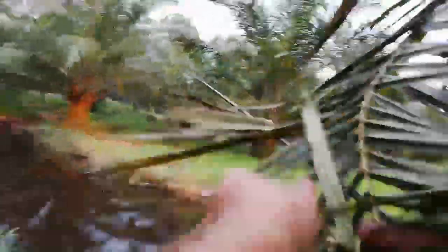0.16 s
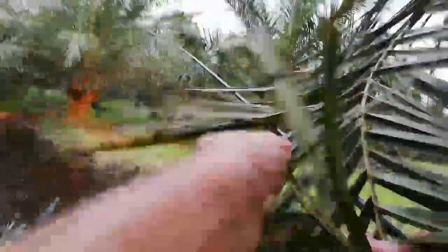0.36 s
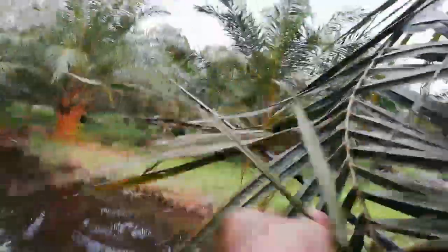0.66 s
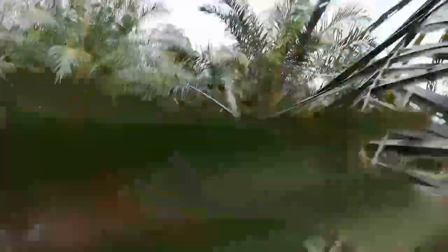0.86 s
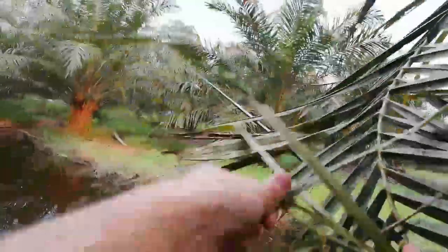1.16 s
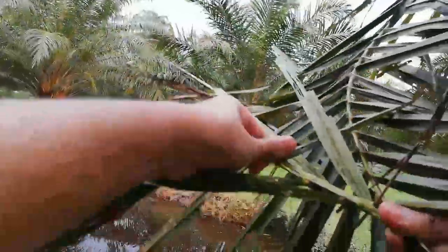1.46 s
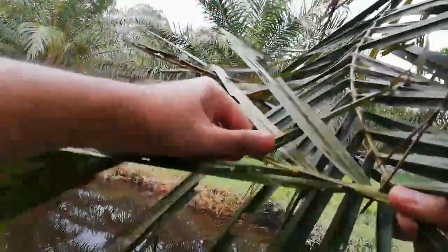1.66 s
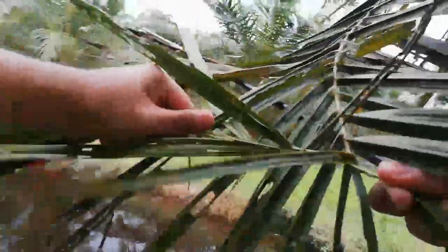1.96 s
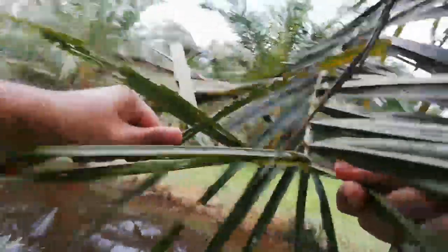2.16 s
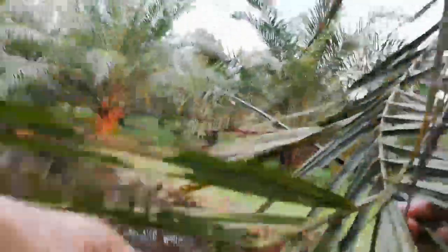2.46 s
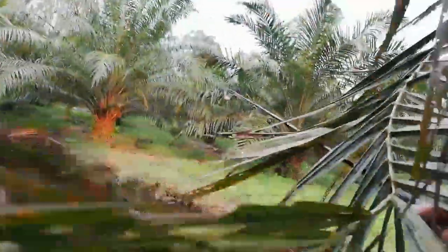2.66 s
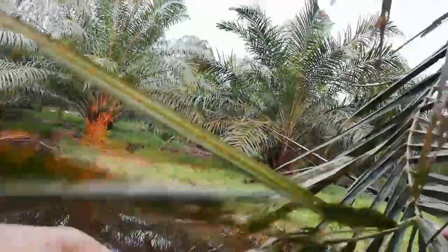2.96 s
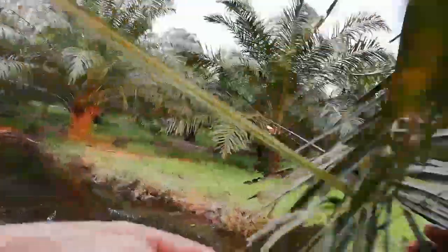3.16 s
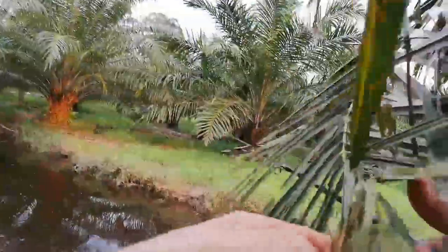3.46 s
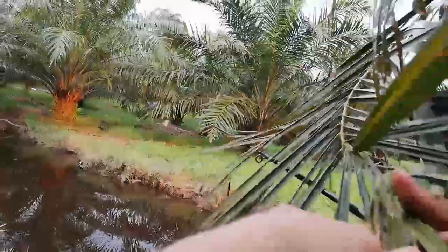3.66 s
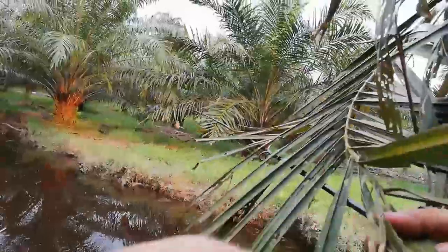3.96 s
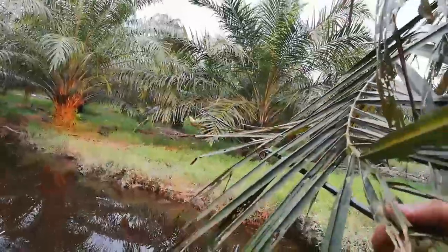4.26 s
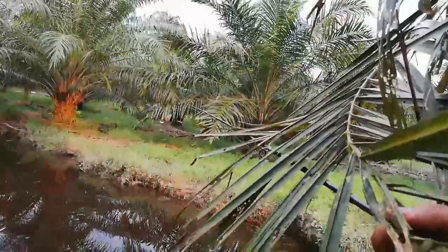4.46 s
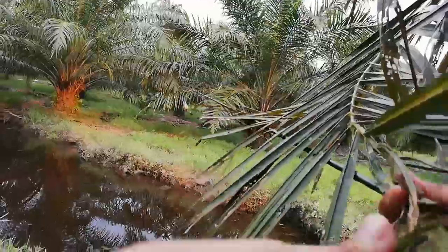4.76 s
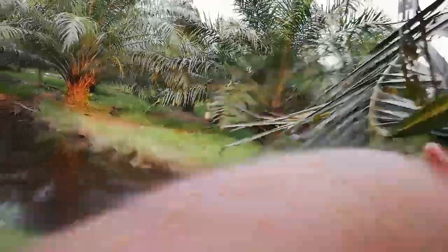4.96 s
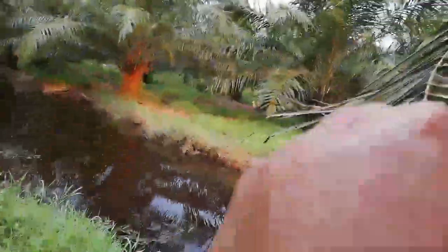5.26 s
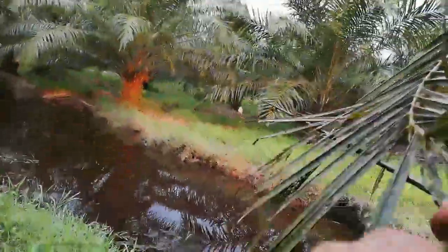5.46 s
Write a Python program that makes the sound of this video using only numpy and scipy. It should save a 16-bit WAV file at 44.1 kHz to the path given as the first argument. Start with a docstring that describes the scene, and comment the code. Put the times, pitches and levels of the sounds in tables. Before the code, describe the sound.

A hand works through a palm frond right beside a small stereo microphone outdoors. From 0 to 1 second, strong dry rustles come in quick pulls, with bright brittle crackle, sharp snaps, including hard ones near 0.14, 0.4 and 0.56, hollow blade slaps and dull bumps on the microphone body. From about 1.0 to 1.6 it falls nearly still, with only fine high clicks. Short scrapes and crisp snaps return at 1.8, then a compact flurry of slaps, thuds and rubbing at 2.1 to 2.2. Softer rustling leads to a fuller scrape, drag and slaps between 3.0 and 3.8. After sparse, quieter rustling around 4 to 4.5, the pulls strengthen, peaking at 4.9 to 5.1 with a heavy dull bump, and crackling snaps continue to about 5.4. Light wind rumble, airy hiss and a faint low wavering drone, perhaps a far engine, stay underneath.

```python
"""Outdoors, within arm's reach of a palm frond: a hand pulls through it right beside a camera.
Dry leaflets scrape and crackle as trains of ringing slips; they snap as decaying bursts, and broad blades
slap with hollow resonances. Leaves and fingers bump (dull thuds) and rub (hollow wandering noise) the body.
Behind are light wind and hiss of filtered noise and a low wavering sine drone, perhaps a far engine.
Two spaced microphone ports: frond sounds and bumps arrive at one slightly before the other."""
import sys
import numpy as np
from scipy import signal
from scipy.fft import rfft, irfft, next_fast_len
from scipy.io import wavfile
from scipy.ndimage import uniform_filter1d, map_coordinates

SR = 44100
rng = np.random.default_rng(int(sys.argv[2]) if len(sys.argv) > 2 else 0)


def unload_wav(signal):
    """Save mono or channel-first audio to the path in sys.argv[1] as 16-bit WAV at rate SR, clipped to [-1, 1]."""
    wavfile.write(
        sys.argv[1],
        SR,
        np.round(np.clip(np.atleast_2d(signal).T, -1, 1) * 32767).astype(np.int16),
    )


N = 247820

# In every table pan_db is left over right before any offset; levels are before the gains in the functions.
# Leaflets sliding through the hand, one row a pull:
# start_s, length_s, edge_level_db, blade_level_db, pan_db
PULL_STROKES = [(0.0, 0.15, -26, -29, -4), (0.239, 0.19, -29.5, -34.5, -2.5), (0.414, 0.23, -35, -40, -1),
                (0.551, 0.022, -28.5, -23.5, -4), (0.567, 0.24, -37.5, -46, -4.5),
                (0.782, 0.18, -42, -39.5, 5.5), (0.866, 0.154, -47, -37, 8),
                (0.907, 0.03, -29.5, -33.5, 16), (1.617, 0.2, -42, -67, 0.5),
                (1.767, 0.14, -32.5, -35.5, -1.5), (1.81, 0.04, -31.5, -36.5, 1),
                (2.121, 0.041, -29.5, -36.5, -6.5), (2.169, 0.24, -38.5, -44, -2.5),
                (2.631, 0.39, -45.5, -42, 3), (2.847, 0.026, -42, -37, 8), (2.946, 0.026, -37, -36, 7),
                (3.157, 0.2, -32.5, -32.5, 10), (3.238, 0.037, -27.5, -24, 8),
                (3.391, 0.23, -35.5, -39.5, -2), (3.636, 0.28, -40.5, -40.5, 0.5),
                (4.036, 0.294, -46, -40, 0.5), (4.378, 0.041, -35.5, -35, 5.5),
                (4.513, 0.085, -36, -36, 0.5), (4.608, 0.23, -43, -39, 2), (4.698, 0.027, -32.5, -30, 0),
                (4.753, 0.24, -30.5, -33, 0.5), (4.887, 0.056, -25, -25, 4), (5.022, 0.085, -28, -30, 5.5),
                (5.08, 0.16, -39.5, -42.5, -3), (5.231, 0.12, -28.5, -43.5, -5),
                (5.402, 0.21, -36, -40.5, 0.5)]
# Spectrum of the dry leaflet edges: frequency_hz, relative_level_db
EDGE_SPECTRUM = [(900, -56.5), (2500, -12), (6300, -2.5), (8200, 1), (10300, -2), (12500, -1.5),
                 (15200, -6), (16500, -76)]
# Spectrum of the scraping blades: frequency_hz, relative_level_db
BLADE_SPECTRUM = [(120, -6.5), (300, 3.5), (550, -10), (900, -1), (1300, -4.5), (2200, -3.5), (3500, -3),
                  (6500, 1), (12000, -17.5)]
# Spectrum of the wind rumble at the ports: frequency_hz, relative_level_db
WIND_SPECTRUM = [(20, -6), (70, -6), (140, -10.5), (400, -45)]
# Spectrum of the open air: frequency_hz, relative_level_db
AIR_SPECTRUM = [(110, -4), (240, -35), (550, -17), (1650, -16.5), (4900, -15.5), (6200, -25), (9400, -1),
                (11500, -24), (16000, -54)]
# Swelling and fading of the far drone: time_s, level_db
DRONE_LEVELS = [(0, -62), (2.1, -43.5), (4.2, -48.5), (4.9, -44), (5.6, -56.5)]
# Skin and leaves dragging over the camera body: start_s, length_s, level_db
RUB_STROKES = [(0.02, 0.1, -45.5), (0.543, 0.15, -48), (1.76, 0.15, -52), (2.126, 0.056, -35.5),
               (2.989, 0.47, -42.5), (3.52, 0.61, -49), (4.514, 0.075, -49), (4.69, 0.073, -44),
               (4.863, 0.2, -39), (5.08, 0.26, -49)]
# Soft knocks on the camera body: start_s, level_db, pitch_hz
BODY_BUMPS = [(0.056, -34.5, 213), (0.154, -29.5, 95), (0.377, -36.5, 149), (0.578, -30.5, 175),
              (0.625, -26.5, 89), (0.675, -32, 144), (1.291, -51, 99), (1.851, -33.5, 95.5),
              (2.131, -29, 137), (2.146, -31, 130), (2.207, -30.5, 168), (4.715, -40, 113),
              (4.934, -35.5, 151), (5.027, -24, 132)]
# Broad blades striking: start_s, level_db, pitch_hz, pan_db
BLADE_SLAPS = [(0.063, -18, 1260, -4.5), (0.081, -22.5, 1260, -4), (0.1632, -24.5, 1520, -31),
               (0.2235, -19.5, 850, 10), (0.4, -19.5, 1370, -3), (0.5648, -18, 1150, -3.5),
               (0.573, -22.5, 900, -7.5), (0.8333, -18, 750, 12), (0.887, -22, 764, 9),
               (0.9573, -21.5, 1240, 15), (2.133, -27.5, 1200, -8), (2.151, -30.5, 1200, -13),
               (2.2066, -20, 900, -3), (2.2117, -22, 1300, -9), (2.2196, -24.5, 1050, -22),
               (3.464, -27.5, 1090, 28), (3.4807, -20.5, 895, 6), (3.5033, -20.5, 1290, -4.5),
               (3.8157, -20, 1200, 6), (5.013, -23, 1030, 7)]
# Stiff leaflets buckling: start_s, level_db (over a millisecond), pitch_hz, pan_db
LEAFLET_SNAPS = [(0.0652, -9.5, 5930, -17), (0.1168, -17.5, 9300, -22), (0.137, -6.5, 8800, 3),
                 (0.1637, -21, 4340, -20), (0.225, -15, 5940, 5), (0.3056, -18, 8900, -1),
                 (0.3168, -14.5, 6600, 0.5), (0.3949, -3.5, 4940, -0.5), (0.3992, -12.5, 4400, 0),
                 (0.4056, -12.5, 5700, -0.5), (0.468, -18.5, 10200, -1), (0.5428, -18, 8850, -4.5),
                 (0.5648, -5.5, 11500, -24), (0.8331, -16.5, 8800, 18), (0.959, -19.5, 4840, 23),
                 (1.1247, -32, 3230, -3), (1.231, -26.5, 8000, -0.5), (1.294, -25, 10000, 0),
                 (1.3, -30, 11000, -4), (1.3315, -23.5, 12000, 0.5), (1.379, -19.5, 11500, 4),
                 (1.3884, -18, 11000, -3.5), (1.4025, -41, 10500, -1), (1.411, -22, 12000, 3),
                 (1.442, -26, 10000, 0), (1.6947, -23, 11000, 2), (1.781, -21, 9900, -2.5),
                 (1.7968, -16.5, 7260, -11), (1.803, -9.5, 10400, -6), (1.817, -10, 10000, 2),
                 (1.8955, -10, 7750, 18), (2.0846, -18, 10300, -7), (2.1083, -18.5, 10500, -1),
                 (2.1122, -16.5, 12100, 5), (2.1344, -11.5, 9250, -4), (2.2105, -19.5, 5500, -23),
                 (2.22, -19.5, 9300, -22), (2.3334, -25.5, 7750, -2.5), (2.3796, -21.5, 10000, -16),
                 (2.6368, -20.5, 7550, -3.5), (2.727, -23, 5800, 17), (2.8015, -31, 2740, -2),
                 (3.143, -22, 8350, 5), (3.17, -19, 7500, 21), (3.1835, -15.5, 8200, 24),
                 (3.27, -17, 7250, 17), (3.3194, -17, 4750, 24), (3.358, -18, 7300, 22),
                 (3.3664, -23, 5500, 5), (3.504, -20, 9900, -5), (3.6342, -19, 8500, -1.5),
                 (3.681, -29, 10800, -12), (3.6917, -15.5, 9500, 19), (3.7826, -17.5, 11000, -11),
                 (3.9166, -21, 10000, -4), (3.9305, -24, 10000, 5), (4.0003, -20.5, 8500, 0),
                 (4.2696, -18, 4800, 0.5), (4.7057, -21.5, 6200, 1), (4.8076, -19, 9800, -4.5),
                 (4.966, -9.5, 11600, -4), (5.044, -18, 7460, 7), (5.07, -22, 8500, -6),
                 (5.083, -14.5, 6950, -1), (5.091, -9.5, 7050, 0.5), (5.2218, -19.5, 6300, -13),
                 (5.26, -10, 11100, -16), (5.2747, -12, 7900, 5), (5.2886, -11.5, 7700, 0),
                 (5.3312, -20, 9900, -4), (5.349, -13, 7000, -3.5), (5.4146, -17, 8200, -11)]
# Colour of the left microphone port: frequency_hz, gain_db
LEFT_PORT_COLOUR = [(1000, 1.5), (1500, 0), (4500, -1.5), (6300, -2.5), (8000, 2), (10500, 0), (14000, -7)]
# Colour of the right microphone port: frequency_hz, gain_db
RIGHT_PORT_COLOUR = [(550, 1), (1200, 5.5), (4500, -1), (7500, -4.5), (10500, 4), (14000, -5.5)]

PORT_DELAY_S = .0006  # between the ports for a sound from the side
TOP_HZ = 16300  # upper band limit
# A stroke tightens by the swell, up to the crest (share of its length).
PULL_ATTACK_S, PULL_RELEASE_S, PULL_SWELL_DB, PULL_CREST = 0.006, .014, 3, 0.53
RUB_ATTACK_S, RUB_RELEASE_S, RUB_SWELL_DB, RUB_CREST = 0.019, 0.034, 1.5, 0.25
TURN_DB, TURN_RATE = 2.5, 9  # leaflets take turns in the hand: depth, random knots a second
STIR_EDGE_DB, STIR_BLADE_DB = -47.5, -54  # the held frond never quite rests; before the rustle gains
WIND_DB = -49.5  # light wind between jolts
DRONE_HZ = 64.6  # centre of the wavering pitch
GRIP_DB = -66.5  # the hand that holds the camera, before the rubbing gain
FRACTURE_DB = 15  # first clean break of a snap, over the buckling


def amp(db):
    """Decibels to gain."""
    return 10 ** (np.asarray(db) / 20)


def unit(x):
    """Scale to rms 1."""
    return x / np.sqrt(np.mean(x ** 2) + 1e-20)


def curves(rows):
    """One value per sample for each column after the time."""
    s, *cols = np.transpose(rows)
    return [np.interp(np.arange(N) / SR, s, c) for c in cols]


def wobble(rate, at=None):
    """A smooth random curve, rate knots a second, read at the given samples or at all."""
    at = np.arange(N) if at is None else at
    knots = rng.standard_normal(int(N * rate / SR) + 4)
    return map_coordinates(knots, [at * rate / SR])


def coloured(x, points):
    """Causal minimum-phase filter through (Hz, dB) points."""
    m = 2 * next_fast_len(N // 2 + 4096)
    f, db = np.transpose(points)
    log_f = np.log(np.fft.rfftfreq(m, 1 / SR) + 1)
    gain = amp(np.interp(log_f, np.log(f), db))
    # Folding the cepstrum forward in time makes the filter causal.
    cepstrum = irfft(np.log(gain))
    cepstrum[1:m // 2] *= 2
    cepstrum[m // 2 + 1:] = 0
    return irfft(rfft(x, m) * np.exp(rfft(cepstrum)), m)[..., :N]


def resonance(x, hz, q):
    """One damped resonance."""
    w = 2 * np.pi * min(hz, .45 * SR) / SR
    damping = np.sin(w) / (2 * q)
    return signal.lfilter([damping, 0, -damping], [1 + damping, -2 * np.cos(w), 1 - damping], x)


def sides(pan_db):
    """Left and right gains of constant power."""
    gains = np.array([amp(pan_db / 2), amp(-pan_db / 2)]).reshape(2, -1)
    return gains / np.sqrt(np.mean(gains ** 2, axis=0))


def port_lead(pan_db):
    """Seconds by which the left port hears a sound before the right; negative when the right is first."""
    return PORT_DELAY_S * np.tanh((pan_db + 2.5) / 1.5)


def noise_pair(size, apart):
    """White noise at both ports: a shared part and a part of their own."""
    return unit(rng.standard_normal(size) + apart * rng.standard_normal((2, size)))


def add(out, sound, s, pan_db):
    """Place a sound with its level and arrival time at each port."""
    lead = port_lead(pan_db) / 2
    for port, wave, start in zip(out, sound * sides(pan_db), (s - lead, s + lead)):
        room = port[max(0, round(start * SR)):][:len(wave)]
        room += wave[:len(room)]


def stroke(start, length, attack_s, release_s, swell_db, crest):
    """Gain of one sliding contact: it takes hold, tightens to a crest, eases and dies away."""
    t = np.arange(N) / SR - start
    crest = np.clip(crest, .05, .95)
    tension_db = np.interp(t / length, [0, crest, 1], [-swell_db, 0, -swell_db])
    attack = np.clip(t / attack_s, 0, 1)
    release = np.exp(-np.maximum(t - length, 0) / release_s)
    return attack * release * amp(tension_db)


def pulling():
    """Edge gain, blade gain and direction of all pulls together, over the faint stirring of the frond."""
    edge, blade, lean = amp(STIR_EDGE_DB) ** 2, amp(STIR_BLADE_DB) ** 2, 0
    for start, length, edge_db, blade_db, pan_db in PULL_STROKES:
        gain = stroke(start, length, PULL_ATTACK_S, PULL_RELEASE_S, PULL_SWELL_DB, PULL_CREST)
        edge_power = (amp(edge_db) * gain) ** 2
        blade_power = (amp(blade_db) * gain) ** 2
        edge = edge + edge_power
        blade = blade + blade_power
        lean = lean + pan_db * (edge_power + blade_power)
    return np.sqrt(edge), np.sqrt(blade), lean / (edge + blade)


def ticks(pan_db, rate, catch_db, catch_rate):
    """A leaflet catches and slips in fits: impulses of widely varied size at both ports."""
    at = np.flatnonzero(rng.random(N) < rate / SR)
    size, place, path = rng.standard_normal((len(at), 3)).T
    size_db = 4.5 * np.minimum(size, 2.0) + catch_db * np.minimum(wobble(catch_rate, at), 1.5)
    turn_db = TURN_DB * wobble(TURN_RATE, at)
    size = amp(size_db + turn_db) * rng.choice([-1, 1], len(at))
    # Every slip is at another point of the frond, so its delay between the ports differs a little.
    lag = port_lead(pan_db[at] + 2 * place) + .00007 * path
    later = np.clip(at + np.round(SR * lag).astype(int), 0, N - 1)
    arrivals = zip((at, later), sides(3 * place))
    return unit(np.array([np.bincount(i, size * g, N) for i, g in arrivals]))


def crackle(spectrum, leaflets, catches, lowest_hz, highest_hz, q, catch_db, clump_db, clump_rate):
    """Each leaflet rings at its own pitch over a sliding hiss; catches let go with dry clicks."""
    pitches = np.geomspace(lowest_hz, highest_hz, len(leaflets))
    rings = unit(sum(resonance(slips, hz, q) for slips, hz in zip(leaflets, pitches)))
    hiss = .25 * rng.standard_normal((2, N))
    scrape = unit(rings + unit(sum(leaflets)) + hiss)
    clumped = scrape * amp(clump_db * wobble(clump_rate))
    sound = coloured(clumped + amp(catch_db) * catches, spectrum)
    # The leaflets share the pull of the hand: while one catches, the others ease.
    power = uniform_filter1d(np.mean(sound ** 2, axis=0), SR // 12)
    return sound / np.sqrt(np.abs(power) + 1e-12)


def rustle(count=13):
    """Dry edges tick brightly while blades scrape with a hollow, papery tone; a catch sounds in both."""
    edge_gain, blade_gain, pan_db = pulling()
    edge_slips = [ticks(pan_db, rate=400, catch_db=1.5, catch_rate=60) for _ in range(count)]
    blade_slips = [ticks(pan_db, rate=500, catch_db=5.0, catch_rate=40) for _ in range(count)]
    catches = ticks(pan_db, rate=95, catch_db=3, catch_rate=30)
    edges = crackle(EDGE_SPECTRUM, edge_slips, catches, 2780, 14400,
                    q=7.2, catch_db=-9, clump_db=2.7, clump_rate=70)
    blades = crackle(BLADE_SPECTRUM, blade_slips, catches, 463, 4810,
                     q=9, catch_db=-8, clump_db=3.2, clump_rate=62)
    edges = amp(3.0) * edge_gain * edges * sides(0.79 * pan_db - 2.0)
    blades = amp(2.07) * blade_gain * blades * sides(pan_db + 5.0)
    return edges + blades


def outdoors(air_db=-48.0, jolt_db=-11.0, jolt_s=0.056):
    """Wind rumble that swells when the camera is jolted, a low wavering drone and the open air's high hiss."""
    t = np.arange(N) / SR
    drone_db, = curves(DRONE_LEVELS)
    jolts = sum(amp(db + jolt_db) * np.exp(-((t - s) / jolt_s) ** 2) for s, db, hz in BODY_BUMPS)
    flow = amp(WIND_DB) + jolts
    wind = unit(coloured(noise_pair(N, apart=.15), WIND_SPECTRUM) * amp(2.6 * wobble(9)))
    turns = np.cumsum(DRONE_HZ + 2.2 * wobble(20)) / SR
    drone = unit(np.sin(2 * np.pi * turns) * amp(2.6 * wobble(12)))
    air = unit(coloured(noise_pair(N, apart=1.0), AIR_SPECTRUM))
    return flow * wind + amp(drone_db) * drone + amp(air_db) * air


def rubbing(hollow_hz=240, width_hz=150, wander_db=0.5, wander_rate=30, uneven_db=3.0,
            scuff_hz=360, scuff_db=-6):
    """Uneven drag on the body: a hollow note, alike at both ports, wanders with the contact over a scuff."""
    power = sum((amp(db) * stroke(s, length, RUB_ATTACK_S, RUB_RELEASE_S, RUB_SWELL_DB, RUB_CREST)) ** 2
                for s, length, db in RUB_STROKES)
    # A pitch wander in decibels: 6 dB is about an octave.
    phase = 2 * np.pi * np.cumsum(hollow_hz * amp(wander_db * wobble(wander_rate))) / SR
    hollow = unit(wobble(width_hz) * np.cos(phase) + wobble(width_hz) * np.sin(phase))
    scuff = resonance(noise_pair(N, apart=1), scuff_hz, 0.94)
    scuff = unit(resonance(scuff, scuff_hz, 0.94))
    drag = unit((hollow + amp(scuff_db) * scuff) * amp(uneven_db * wobble(wander_rate)))
    return amp(1.54) * np.sqrt(power + amp(GRIP_DB) ** 2) * drag


def bumps(push_s=0.0028, q=1.1, gain_db=-8.5, rough_db=-4, rock_hz=250, rock_db=-2):
    """A soft push gives a dull, slightly rough thud and rocks the camera, moving the ports in opposite senses."""
    out, t = np.zeros((2, N)), np.arange(SR // 10) / SR
    pressure = t * np.exp(-t / push_s)
    for s, db, hz in BODY_BUMPS:
        push = noise_pair(len(t), apart=0.49) * pressure
        tone = unit(pressure * np.sin(2 * np.pi * hz * t))
        rough = unit(resonance(resonance(push, hz, q), hz, q))
        thud = tone + amp(rough_db) * rough
        rock = unit(resonance(resonance(push[0], rock_hz, 1), rock_hz, 1))
        add(out, amp(db + gain_db) * (thud + amp(rock_db) * np.array([rock, -rock])), s, 0)
    return out


def slaps(contact_s=0.0068, strike_db=20, q=5, gain_db=-11.0, body_ratio=0.555, body_db=-8,
          smack_hz=3800, smack_db=-17):
    """A sharp smack and brief rough contact excite a damped, hollow pop with a lower bending mode under it."""
    out, t = np.zeros((2, N)), np.arange(SR // 25) / SR
    for s, db, hz, pan_db in BLADE_SLAPS:
        rough = noise_pair(len(t), apart=0.68) * np.exp(-t / contact_s)
        contact = rough + amp(strike_db) * (t == 0)
        pop = resonance(contact, hz, q) + amp(body_db) * resonance(contact, body_ratio * hz, q)
        smack = amp(smack_db) * resonance(contact, smack_hz, 0.57)
        add(out, amp(db + gain_db) * unit(pop + smack), s, pan_db)
    return out


def snaps(tear_db=-19, ring_db=-15, q=0.96, crack_db=-19, flex_db=-18, flex_hz=1400, flex_s=0.0026):
    """Fibres start to tear, the leaflet breaks with one clean click; its rib rings briefly and its blade flexes."""
    out, t = np.zeros((2, N)), np.arange(-SR // 200, SR // 30) / SR
    buckle = np.exp(-np.abs(t) / np.where(t < 0, .00008, .0007))
    fibre_decay = np.exp(-np.abs(t) / np.where(t < 0, .002, .004))
    fibres = np.where(t < 0, amp(tear_db), amp(ring_db)) * fibre_decay
    fracture = amp(FRACTURE_DB) * (np.arange(len(t)) == np.argmax(buckle))
    millisecond = np.sqrt(SR / 1000 / len(t))  # rms over a millisecond to rms over the whole snap
    for s, db, hz, pan_db in LEAFLET_SNAPS:
        force = noise_pair(len(t), apart=1.0) * (buckle + fibres) + fracture
        rib = unit(resonance(resonance(force, hz, q), hz, 0.26)) + amp(crack_db) * unit(force)
        flex = noise_pair(len(t), apart=0.85) * (t > 0) * np.exp(-t / flex_s)
        blade = unit(resonance(flex, flex_hz * amp(rng.normal(0, 3.04)), 3.0))
        # The narrow, high-pitched tips have hardly any blade to flex.
        blade = blade * (6500 / hz) ** 2
        snap = unit(rib + amp(flex_db) * blade)
        add(out, amp(db + 1.83) * millisecond * snap, s + t[0], pan_db)
    return out


def scene():
    """The frond close by, the handling and the background."""
    return rustle() + outdoors() + rubbing() + bumps() + slaps() + snaps()


def record(dry):
    """Each microphone port colours the sound; peaks clip at full scale, then the band limit cuts the top."""
    left = coloured(dry[0], LEFT_PORT_COLOUR)
    right = coloured(dry[1], RIGHT_PORT_COLOUR)
    ports = np.clip(np.array([left, right]), -1, 1)
    m = next_fast_len(N + 4096)
    passed = np.fft.rfftfreq(m, 1 / SR) < TOP_HZ
    return irfft(rfft(ports, m) * passed, m)[:, :N]


dry = scene()
out = record(dry)
unload_wav(out)
```